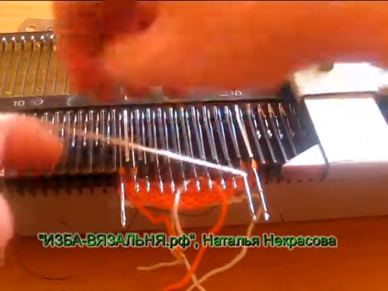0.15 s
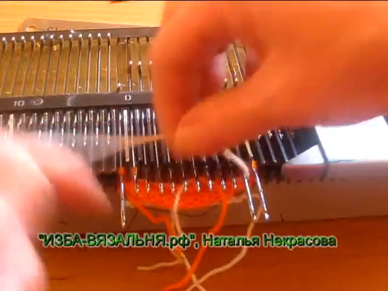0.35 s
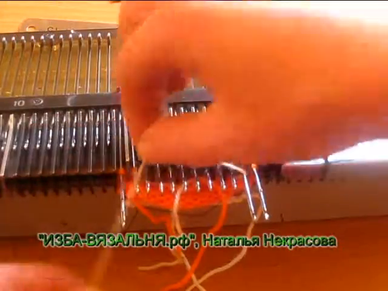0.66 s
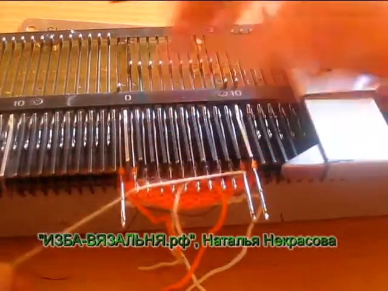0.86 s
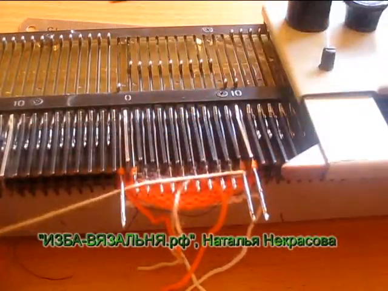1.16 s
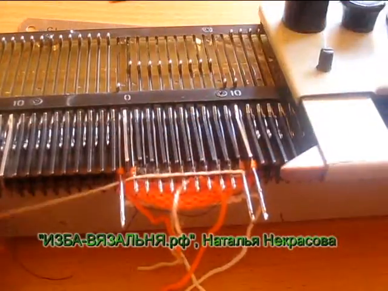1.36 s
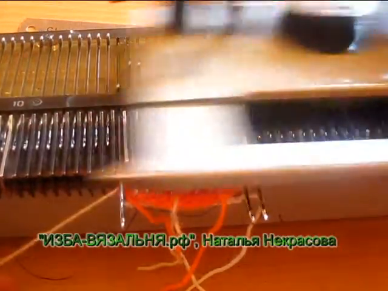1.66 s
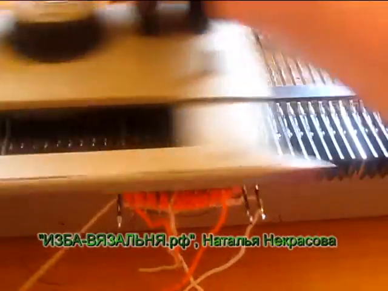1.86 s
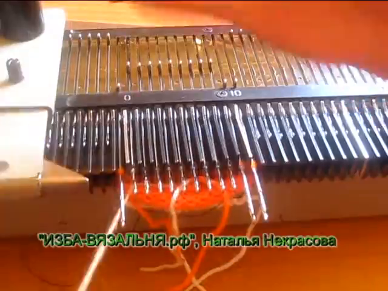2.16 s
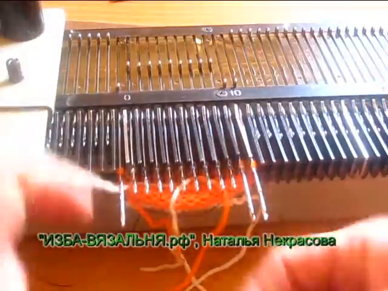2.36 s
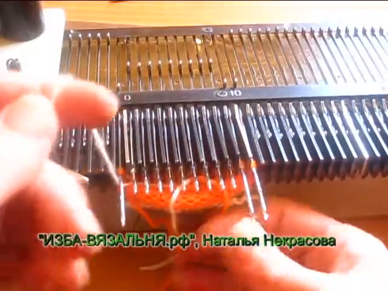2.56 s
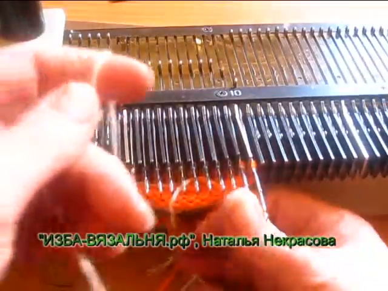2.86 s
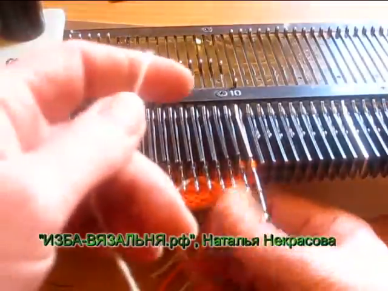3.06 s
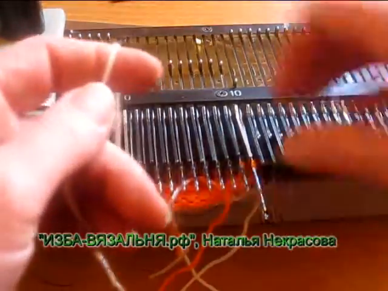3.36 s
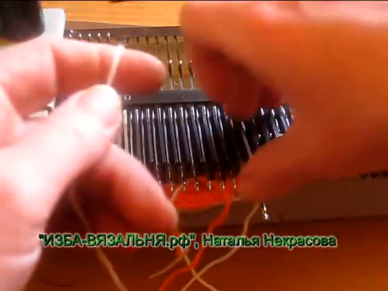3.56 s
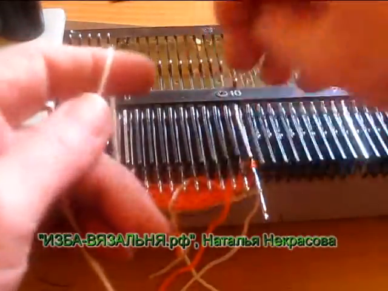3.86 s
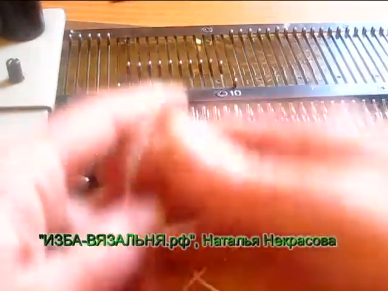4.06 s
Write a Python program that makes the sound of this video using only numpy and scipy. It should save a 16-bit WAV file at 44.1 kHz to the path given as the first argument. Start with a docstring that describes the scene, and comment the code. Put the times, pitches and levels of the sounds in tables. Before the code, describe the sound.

A hand knitting machine is heard close up in a quiet room. From about 0.3 seconds, fingers draw yarn over the steel needles in faint, crackly swishes, with small taps near 0.9 and 1 second. At 1.4 seconds the carriage jolts with a sharp metallic clack. From 1.6 to 2.3 seconds it slides across the bed, flicking the needles in a loud, rapid rattle over a gritty scrape, with brief metallic ringing and a light hollow rumble. Soft yarn strokes return around 2.5 and 3 seconds. A dull fingertip knock comes at 3.3 seconds, a light tap at 3.8, and a brighter yarn rustle with a sharp click at about 4.1. Steady microphone hiss and faint low electrical pops run underneath throughout.

```python
"""In a quiet room, close up, fingers draw hissing yarn over a steel needle bed, with a few small taps.
At 1.4 s the carriage jolts. From 1.6 to 2.3 s it slides across: its cams flick the needles one by one
over a gritty scrape, and both set the bed ringing. Yarn strokes and taps go on, with a dull fingertip
knock at 3.3 s. Throughout, a small camera adds hiss, low electrical pops, gain control and a notch
near 8 kHz."""
import sys
import numpy as np
from scipy import signal
from scipy.fft import rfft, irfft, next_fast_len
from scipy.io import wavfile
from scipy.ndimage import uniform_filter1d

SR = 44100
rng = np.random.default_rng(int(sys.argv[2]) if len(sys.argv) > 2 else 0)


def store_pcm(level_fs):
    """Save levels as 16-bit WAV."""
    pcm = np.round(np.clip(level_fs, -1, 1) * 32767).astype(np.int16)
    wavfile.write(sys.argv[1], SR, np.atleast_2d(pcm).T)


N = 185890
NOTCH_HZ = 7860  # "treble" is the band above this; a share is a level relative to the row's main level

# Spectral envelope of bed and carriage: frequency_hz, gain_db
BED_SPECTRUM = [(150, -74), (260, -44), (490, -13), (750, -12), (1100, 0.5), (1530, -1.5), (2400, -0.5),
                (3900, -4), (5200, -5), (6420, -6.5), (7900, -11.5), (10200, -7), (13000, -8), (15800, -9)]
# Normal modes of the bed: pitch_hz, level_db, t60_s
BED_RESONANCES = [(637, -5, 0.038), (865, -2, 0.076), (1112, -8, 0.042), (1400, -4, 0.052),
                  (1760, -4, 0.05), (2167, -4, 0.037), (2730, -9.5, 0.066), (3198, -10, 0.035),
                  (3700, -4.5, 0.047), (4340, -4, 0.033), (4690, 0, 0.03), (6200, -23, .08),
                  (9160, -1, 0.056)]
# Friction of the carriage, one curve for the jolt and one for the pass:
# time_s, level_db, treble_share_db, rumble_share_db
FRICTION_CURVES = [
    [(1.398, -62, -17, -26), (1.421, -29, -15, -24), (1.425, -17, -14, -1.5), (1.435, -25.5, -12, 6),
     (1.442, -16, -12, -3), (1.452, -25, -15, 5), (1.459, -43, -11, 9), (1.475, -55, -8, 7)],
    [(1.617, -40, -10, -15), (1.636, -36, -15, -1), (1.655, -27.5, -14, -4), (1.675, -20.5, -7, -2),
     (1.7, -19.5, -13, -10), (1.76, -24, -8, -25), (1.83, -23, 2, -29), (1.9, -23.5, 0.4, -19),
     (2.06, -21.5, -2, -20), (2.17, -22, -7, -15), (2.24, -31, -11, -1.5), (2.29, -45.5, -14, 1)],
]


def carriage():
    """Forced vibration: flicks and friction drive the bed's modes while the carriage shell rumbles."""
    flicks, flick_treble = needle_flicks()
    level_db, treble_db, rumble_db = along(FRICTION_CURVES)
    scrape = gain_of(level_db) * grit()
    drive = join_bands(flicks + scrape, flick_treble + scrape * gain_of(treble_db))
    t = np.arange(SR // 5) / SR
    modes = sum(decay(t, t60, db) * np.sin(2 * np.pi * hz * t) for hz, db, t60 in BED_RESONANCES)
    ringing = gain_of(-17) * convolved(drive, modes)
    shell_band = signal.butter(3, [270, 750], "bandpass", fs=SR, output="sos")
    rumble = signal.sosfilt(shell_band, gain_of(level_db + rumble_db) * rng.standard_normal(N))
    return colour(drive + ringing, BED_SPECTRUM) + rumble


# Travel of the cam along the bed: time_s, needles_passed
CAM_TRAVEL = [(1.6184, 0), (1.6547, 2), (1.6847, 4), (1.7015, 5), (1.7163, 6), (1.7287, 7), (1.7495, 9),
              (1.7586, 10), (1.8061, 16), (1.8315, 20), (1.867, 26), (1.8904, 30), (1.9179, 33),
              (1.9547, 37), (1.968, 38), (2.0192, 43), (2.056, 47), (2.0888, 51), (2.1066, 53),
              (2.1284, 55), (2.1568, 57), (2.1949, 59)]
# Strength of the cam's push: time_s, flick_db, early_touch_db, treble_share_db
CAM_PUSH = [(1.618, -19.5, -60, -8), (1.637, -18, -60, 5.5), (1.655, -7, -38, 3), (1.671, -29, -30, 2),
            (1.68, -0.5, -0.5, -2.5), (1.7, -5.5, -4.5, 6.5), (1.75, -4, -7, 1), (1.77, -4.5, -26, 3),
            (1.85, -11, -30, 3), (1.93, -21, -27, 1), (1.97, -7.5, -26, 2), (2.05, -9.5, -30, 3),
            (2.1, -9.5, -32, 1), (2.122, -5.5, -30, 2), (2.145, -11, -30, 0), (2.195, -23, -30, -3)]


def cam_strikes():
    """Impact rate follows cam speed: each needle gets a flick, most an early touch just before it."""
    travel_s, passed = np.transpose(CAM_TRAVEL)
    push_s, flick_db, early_db, treble_db = np.transpose(CAM_PUSH)
    scatter_db, ring_hz, pitch_spread = 1.6, (4730, 6520), 0.066  # a needle rings one of two ways
    strikes = []
    for first, lead_gaps, push_db in ((0, 0, flick_db), (1, 0.27, early_db)):
        start_s = np.interp(np.arange(first, passed[-1] + 1) - lead_gaps, passed, travel_s)
        louder, brighter, higher = np.clip(rng.standard_normal((len(start_s), 3)), -1.5, 1.5).T
        level_db = np.interp(start_s, push_s, push_db) + scatter_db * louder
        share_db = np.interp(start_s, push_s, treble_db) + scatter_db * brighter
        pitch_hz = rng.choice(ring_hz, len(start_s)) * (1 + pitch_spread * higher)
        strikes += zip(start_s, level_db, share_db, pitch_hz)
    return strikes


# Needles knocked out of turn, mostly by the jolt: start_s, level_db, treble_share_db, pitch_hz
STRAY_STRIKES = [(1.4222, -0.5, -7, 4530), (1.4289, -10.5, 6, 3500), (1.4324, -8.5, -8, 1630),
                 (1.439, -7.5, -9.5, 4720), (1.456, -24, -7, 1230), (1.6606, -9, 0, 4260),
                 (1.6897, -12, 6, 6640), (1.918, -10.5, 6, 4170)]


def needle_flicks():
    """Impact excitation: a struck needle snaps and rings briefly. Returns main and treble signals."""
    t, flicks = np.arange(SR // 100) / SR, np.zeros((2, N))
    rise = attack(t, 0.00029)
    strikes = cam_strikes() + STRAY_STRIKES
    for start_s, db, treble_db, hz in strikes:
        snap = rise * decay(t, t60_s=0.0079) * np.tanh(rng.standard_normal(len(t)))
        ping = rise * decay(t, t60_s=0.0071, level_db=-2.5) * np.sin(2 * np.pi * hz * t)
        add(flicks, start_s, gain_of(db) * np.array([snap + ping, gain_of(treble_db) * snap]))
    return flicks


def grit(contacts_per_s=3500, grain_s=0.00025):
    """Sliding friction: tiny contacts at random times each release a decaying grain of noise."""
    strength = gain_of(np.minimum(rng.exponential(1, N), 4))
    contacts = strength * (rng.random(N) < contacts_per_s / SR)
    grains = signal.lfilter([1], [1, -np.exp(-1 / (grain_s * SR))], contacts)
    return unit_rms(grains * rng.standard_normal(N))


# Taps of fingers and yarn, knocks of the carriage:
# start_s, tick_db, treble_share_db, ring_hz, ring_db, ring_width_hz, ring_t60_s
LIGHT_IMPACTS = [(.374, -50, 9, 11000, -60, 5000, .01), (.888, -41, 0, 3500, -50, 2000, .03),
                 (.915, -66, 0, 1400, -51, 900, 0.2), (0.9944, -30, 5.5, 1470, -39, 700, 0.051),
                 (1.402, -55, -10, 3660, -38.5, 2000, .15), (1.4222, -10, 0, 6300, -27, 250, .2),
                 (1.436, -30, 0, 9250, -32, 400, .1), (1.5845, -58, -6, 3200, -51, 300, .03),
                 (1.656, -30, 5, 1230, -26, 900, 0.36), (2.45, -68, 0, 850, -55, 250, 0.68),
                 (3.011, -58, 0, 2350, -47, 600, 0.1), (3.824, -35, -1, 1600, -43, 1400, 0.076),
                 (4.1396, -25, -3, 3100, -32, 700, .014)]
# Spectral envelope of the ticks and of the yarn: frequency_hz, gain_db
CONTACT_SPECTRUM = [(700, -16), (1500, -6), (3000, -1), (7000, -1.5), (9000, -6), (12000, -1.5),
                    (16000, -1)]


def taps():
    """Transient and free decay: each tap is a sharp tick and a short ring of narrowband noise."""
    out, t = np.zeros(N), np.arange(SR // 10) / SR
    for start_s, tick_db, treble_db, hz, ring_db, width_hz, t60 in LIGHT_IMPACTS:
        tick = decay(t, t60_s=0.0044, level_db=tick_db) * rng.standard_normal(len(t))
        tick = join_bands(colour(tick, CONTACT_SPECTRUM), tick * gain_of(treble_db))
        band = signal.butter(2, [hz - width_hz / 2, hz + width_hz / 2], "bandpass", fs=SR, output="sos")
        ring = unit_rms(signal.sosfilt(band, rng.standard_normal(len(t))))
        add(out, start_s, tick + ring * attack(t, 0.0011) * decay(t, t60, ring_db))
    return out


def fingertip_knock(start_s=3.3218, pitch_hz=870):
    """Heavily damped oscillation: a dull knock dies within a few cycles."""
    out, t = np.zeros(N), np.arange(SR // 10) / SR
    envelope = attack(t, 0.0008) * decay(t, t60_s=0.009, level_db=-22)
    add(out, start_s, -envelope * np.sin(2 * np.pi * pitch_hz * t))
    return out


# Strokes of yarn over skin and hooks: peak_s, swell_s, fade_s, treble_db, low_band_share_db
YARN_STROKES = [(.3, .025, .025, -56, -10), (.46, .12, .02, -54, -2), (.588, .07, .05, -58, -4),
                (.73, .04, .05, -61, -5), (.895, .085, 0.14, -50, -4.5), (1.02, 0.048, 0.055, -58, 1),
                (1.39, .09, 0.053, -50.5, -5), (2.415, .015, .03, -58, -5), (2.486, 0.085, .055, -59.5, 3),
                (2.96, .16, 0.16, -58.5, -4), (3.19, .03, .025, -59, -12), (4.05, 0.066, 0.014, -45.5, -17),
                (4.113, .008, .03, -42.5, -7), (4.133, 0.023, 0.019, -39, -7.5),
                (4.182, .02, .02, -44, -12)]


def yarn():
    """Stick-slip friction: fibres catch and slip in a crackly hiss that swells and fades each stroke."""
    t, envelopes = np.arange(N) / SR, np.zeros((2, N))
    ends_db = -21.5  # relative to the peak, where the swell starts and the fade ends
    for peak_s, swell_s, fade_s, treble_db, low_db in YARN_STROKES:
        from_peak = np.where(t < peak_s, (peak_s - t) / swell_s, (t - peak_s) / fade_s)
        envelopes += gain_of([[treble_db + low_db], [treble_db]]) * gain_of(ends_db * from_peak ** 1.38)
    crackle = gain_of(2.0 * unit_rms(uniform_filter1d(rng.standard_normal(N), size=60)))
    hiss = unit_rms(colour(crackle * rng.standard_normal(N), CONTACT_SPECTRUM))
    return join_bands(*(envelopes * hiss))


# Reverberation time of the room: frequency_hz, t60_s
ROOM_DECAY = [(300, 0.5), (800, 0.47), (2100, 0.28), (5500, 0.29), (14600, 0.19)]


def room(x):
    """Reverberation: sparse reflections of random sign, each band dying at its own rate."""
    reflections, spacing = np.zeros(SR // 2), 20
    slots = np.arange(120, len(reflections) - spacing, spacing)
    reflections[slots + rng.integers(0, spacing, len(slots))] = rng.choice([-1., 1.], len(slots))
    hz, t, bands = signal.stft(reflections, SR, nperseg=256)
    _, tail = signal.istft(bands * decay(t, at_frequency(ROOM_DECAY, hz)[:, None]), SR, nperseg=256)
    return convolved(x, tail)


# The loudest pops, each a jump of the rest level and its return: start_s, held_s, jump_amplitude
OFFSET_JUMPS = [(0.1017, 0.0046, -0.01), (.1375, .02, -0.0082), (.2313, .0057, 0.0068),
                (.2635, 0.0019, .007), (0.498, 0.0022, 0.012), (.5697, .0071, 0.0068),
                (0.6076, .0015, 0.0069), (0.943, .0051, 0.0086), (1.0389, .0064, 0.0093),
                (1.0915, 0.0045, 0.0089), (1.1078, .002, 0.0084), (1.2051, 0.0026, 0.01),
                (1.2233, 0.0022, 0.0076), (1.457, 0.003, 0.021), (1.5644, 0.0017, 0.012),
                (1.617, 0.0055, 0.013), (2.276, 0.0046, .008), (2.3976, 0.0025, .012),
                (2.4116, .019, -.016), (2.548, .0008, 0.012), (2.713, 0.0056, .0086),
                (2.7987, 0.0049, 0.0086), (3.359, 0.0052, 0.0078), (3.4611, 0.0015, 0.0081),
                (3.4813, .02, -0.0062), (3.575, 0.0011, 0.011), (3.898, .0057, 0.0087),
                (3.9087, .012, 0.011), (4.0285, 0.0067, .0095), (4.1325, 0.003, -0.013)]


def electrical_pops(small_pops_per_s=110):
    """Capacitive coupling: each jump of the rest level drains in a few ms, leaving a low pop."""
    jumps = gain_of(-50.5) * rng.standard_normal(N) * (rng.random(N) < small_pops_per_s / SR)
    for start_s, held_s, jump in OFFSET_JUMPS:
        add(jumps, start_s, np.array([jump]))
        add(jumps, start_s + held_s, np.array([-jump]))
    steps = uniform_filter1d(uniform_filter1d(np.cumsum(jumps), size=9), size=7)  # rounded edges
    for corner_hz in (110, 38):
        steps = signal.lfilter(*signal.butter(1, corner_hz, "high", fs=SR), steps)
    return steps


# Spectral envelope of the preamplifier's noise: frequency_hz, gain_db
HISS_SPECTRUM = [(12, -45), (25, -25), (76, -7), (185, -4), (324, -3.5), (631, -5.5), (834, -7),
                 (2000, -10.5), (5690, -17.5), (7900, -24), (10000, -20.5), (15800, -25.5)]


def preamp_hiss():
    """Electronic noise floor: a steady, coloured Gaussian hiss."""
    return gain_of(-55) * unit_rms(colour(rng.standard_normal(N), HISS_SPECTRUM))


def gain_of(db):
    """Decibels to amplitude ratio."""
    return 10 ** (np.asarray(db) / 20)


def attack(t, rise_s):
    """Exponential rise toward 1."""
    return 1 - np.exp(-t / rise_s)


def decay(t, t60_s, level_db=0):
    """Exponential damping: 60 dB down after t60_s."""
    return gain_of(level_db - 60 * t / t60_s)


def unit_rms(x):
    """Normalisation to rms 1."""
    return x / np.sqrt(np.mean(x ** 2) + 1e-20)


def at_frequency(points, hz):
    """Interpolation on a log-frequency axis."""
    points_hz, values = np.transpose(points)
    return np.interp(np.log(hz + 1), np.log(points_hz + 1), values)


def along(curves):
    """Linear interpolation of each column in time; the level is silent outside the curves."""
    t = np.arange(N) / SR
    out = np.zeros((len(curves[0][0]) - 1, N))
    out[0] = -120
    for rows in curves:
        time_s, *columns = np.transpose(rows)
        inside = (t >= time_s[0]) & (t <= time_s[-1])
        out[:, inside] = [np.interp(t[inside], time_s, column) for column in columns]
    return out


def add(mix, start_s, sound):
    """Superposition: mixes a sound in at start_s."""
    part = mix[..., round(start_s * SR):][..., :sound.shape[-1]]
    part += sound[..., :part.shape[-1]]


def convolved(x, response):
    """Convolution with an impulse response scaled to unit energy."""
    return signal.oaconvolve(x, response / np.linalg.norm(response))[:len(x)]


def colour(x, spectrum):
    """Minimum-phase filtering to the given spectral shape, at power gain 1."""
    hz = abs(np.fft.fftfreq(4096, 1 / SR))
    log_gain = np.log(gain_of(np.maximum(at_frequency(spectrum, hz), -100)))
    response = np.fft.ifft(np.exp(np.conj(signal.hilbert(log_gain)))).real[:2048]
    return convolved(x, response)


def join_bands(low, treble):
    """Crossover: takes low below NOTCH_HZ and treble above it."""
    size = next_fast_len(len(low))
    above = np.fft.rfftfreq(size, 1 / SR) > NOTCH_HZ
    return irfft(np.where(above, rfft(treble, size), rfft(low, size)), size)[:len(low)]


def scene():
    """Direct and reverberant sound add to the camera's noise; taps and yarn are nearest and driest."""
    machine = carriage()
    fingers = taps() + fingertip_knock() + yarn()
    reverberation = room(gain_of(-10.5) * machine + gain_of(-16.5) * fingers)
    return (machine + fingers + reverberation + electrical_pops() + preamp_hiss())[None]


def record(dry):
    """Dynamic compression: gain control lowers loud passages; a narrow notch and a band limit follow."""
    threshold_db, slope, recovery_db_per_s = -35.5, 0.13, 92
    edge_hz, end_s = 15730, 4.2145
    power_db = 10 * np.log10(abs(uniform_filter1d(dry[0] ** 2, size=400)) + 1e-12)
    fall_db = np.arange(N) * recovery_db_per_s / SR
    held_db = np.maximum.accumulate(power_db + fall_db) - fall_db  # jumps to each peak, then sinks
    over_db = np.maximum(held_db - threshold_db, 0)
    ducked = dry / gain_of(slope * uniform_filter1d(over_db, size=200))
    notched = signal.lfilter(*signal.iirnotch(NOTCH_HZ, Q=7.5, fs=SR), ducked)
    lowpass = signal.firwin(511, edge_hz, window=("kaiser", 9), fs=SR)
    return signal.oaconvolve(notched, lowpass[None], "same") * (np.arange(N) < end_s * SR)


dry = scene()
out = record(dry)
store_pcm(out)
```